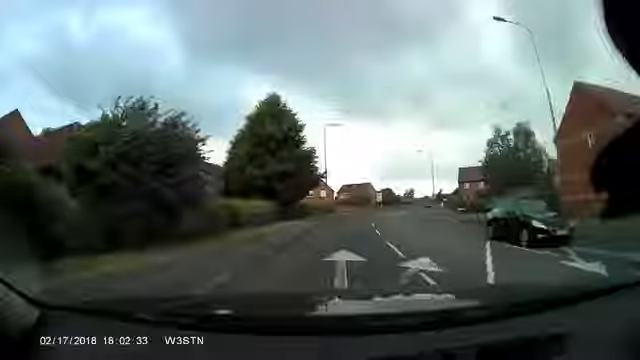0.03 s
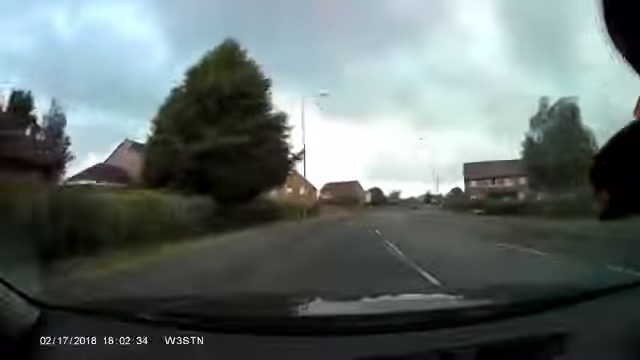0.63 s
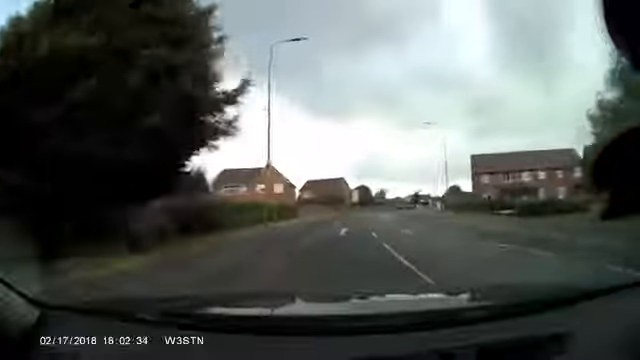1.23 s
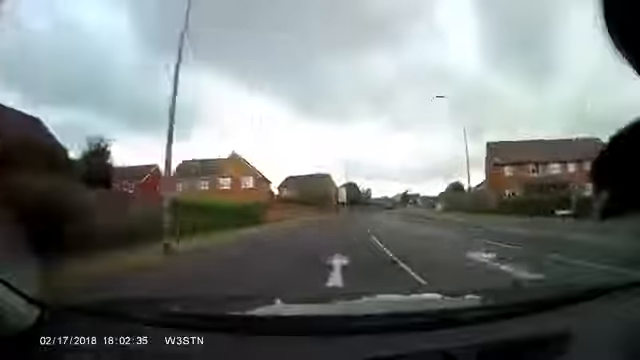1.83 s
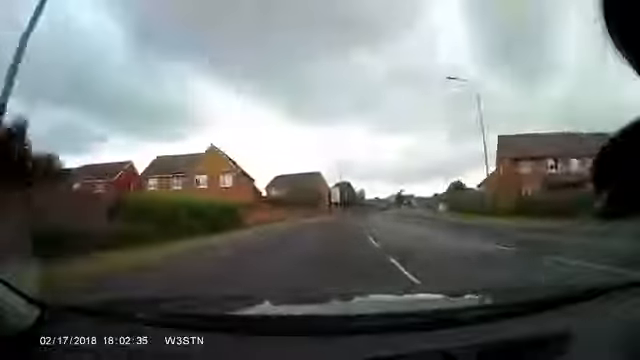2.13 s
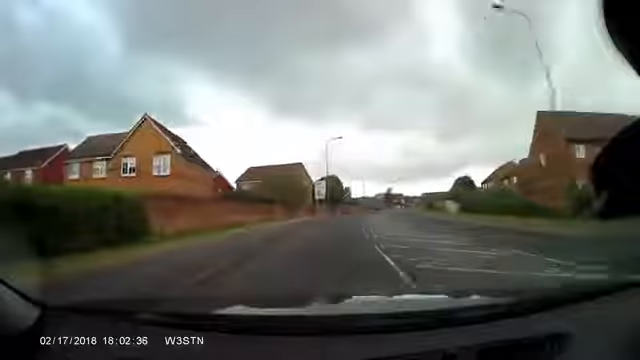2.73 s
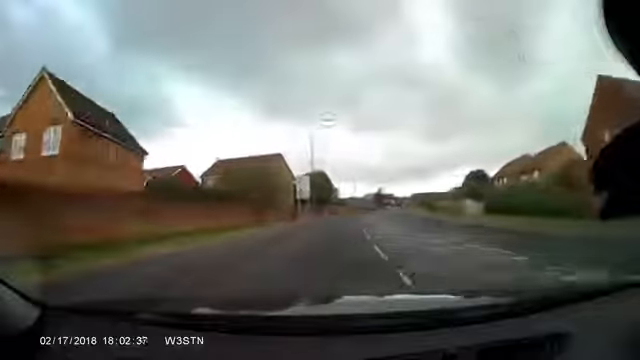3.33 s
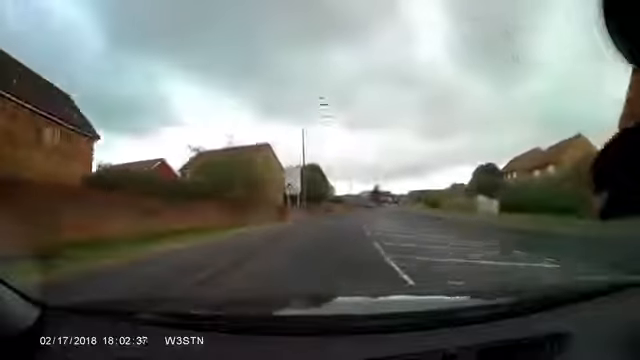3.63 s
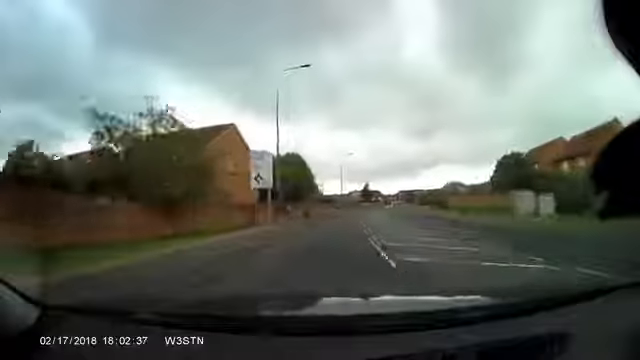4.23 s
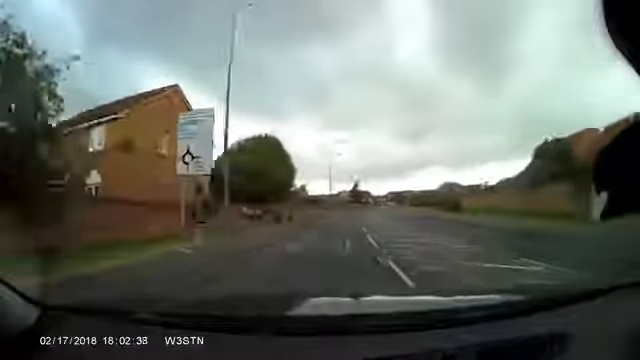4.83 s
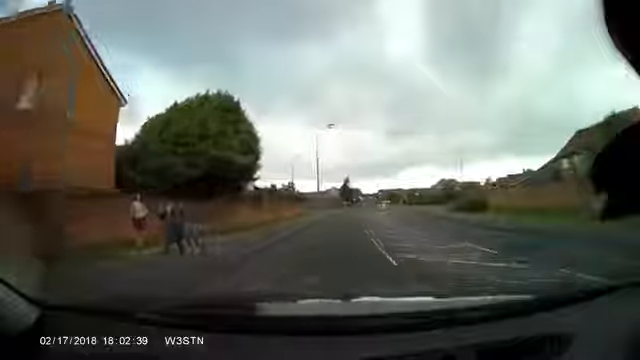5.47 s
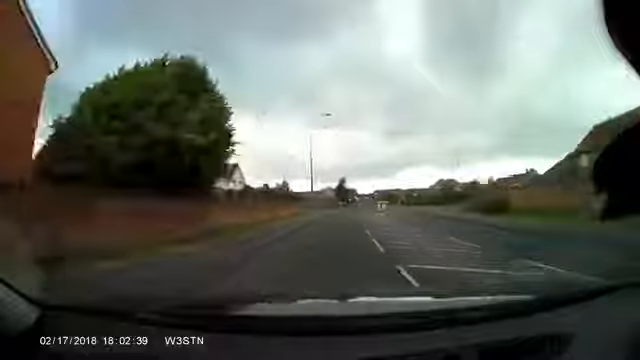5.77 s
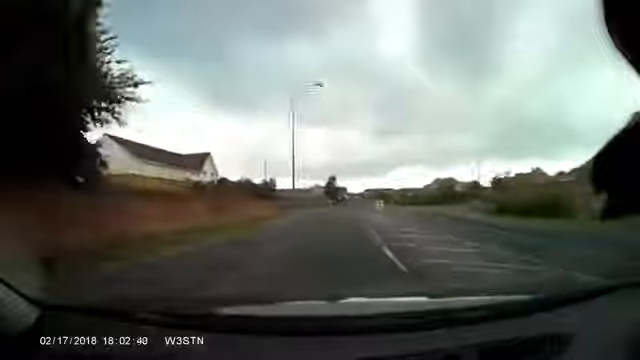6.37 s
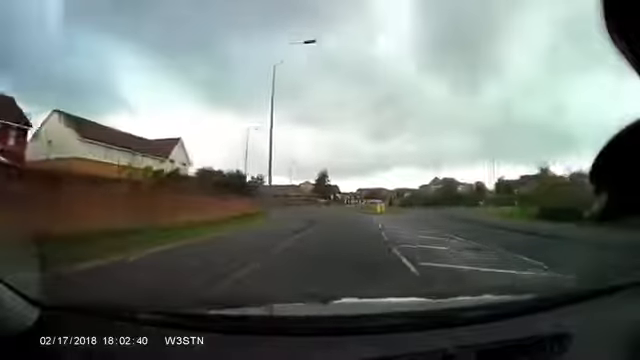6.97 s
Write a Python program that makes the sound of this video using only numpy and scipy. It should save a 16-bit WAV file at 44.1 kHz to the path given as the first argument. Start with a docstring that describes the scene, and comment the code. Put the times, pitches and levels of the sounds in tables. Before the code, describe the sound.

A car rolls over rough asphalt, its cabin filled with a deep hum and tyre noise that gradually soften. A microphone by the windscreen picks up small ticks and rustles from the trim, along with a thin hiss and whine of its own. Late on, something hard hits the bodywork close by, making a single short, slightly distorted bang, and the car keeps rumbling along.

```python
"""A low rumble and the roar of tyres, heard inside a car that gradually eases off on a town road.
The rough road shakes the cabin, which hums at its own favourite pitches, while the trim rustles
and ticks faintly. Near the end a hard object strikes the car once, close by: a panel rings and
overloads the microphone of a camera at the windscreen. The camera adds a faint hiss and whine."""
import sys
import numpy as np
from scipy import signal
from scipy.fft import rfft, irfft
from scipy.io import wavfile
from scipy.ndimage import uniform_filter1d

SR = 44100
rng = np.random.default_rng(int(sys.argv[2]) if len(sys.argv) > 2 else 0)


def master(y):
    """Save y as 16-bit WAV."""
    cut = np.clip(np.atleast_2d(y).T, -1, 1)
    pcm = np.round(cut * 32767)  # scale
    wavfile.write(sys.argv[1], SR, pcm.astype(np.int16))


N = 308700
T = np.arange(N) / SR
HZ = np.fft.rfftfreq(N, 1 / SR)

# The tone of the road's deep boom, low drone and tyre roar. Each row: frequency in Hz, relative dB.
BOOM_TONE = [(8, -17), (45, -20.5), (62, -10.5), (78, -9.5), (97, -3), (135, 3.5), (155, -11), (190, -27),
             (800, -110)]
DRONE_TONE = [(110, -41.5), (150, -8), (175, 1), (220, -0.5), (252, -7.5), (335, -7), (380, -13),
              (490, -14), (580, -21), (800, -32), (4000, -110)]
ROAR_TONE = [(350, -35.5), (600, -2), (780, 0), (1000, -0.5), (1200, -5.5), (1400, -9), (1600, -15),
             (2000, -25.5), (3000, -38), (8000, -65.5), (11000, -89.5)]
# Pitches the cabin and tyre tread favour. Each row: frequency in Hz, width in Hz, boost in dB.
RESONANCES = [(105.7, 7, 5), (128.9, 18, 5.5), (185.5, 23, 3), (213.8, 16.9, 6.5), (440, 25, 2.5),
              (760.5, 22, 6.5), (807.5, 28, 7), (836, 20, 3.5), (921, 46, 6.5), (1190.5, 42, 6.5),
              (1323, 21, 6), (1409, 26, 4)]
# Rougher asphalt. Each row: middle in seconds, length in seconds, boom and drone changes in dB.
ROUGH_STRETCHES = [(1.1, 0.65, 1, 2), (2.93, 0.48, 3.5, 2), (5.06, .25, 5, -1), (5.78, .4, 2.5, 1.1),
                   (6.22, 0.18, -3, 3), (6.8, .4, 2, -.5)]
# The notes of the struck panel. Each row: pitch in Hz, level in dB, seconds to fade by 60 dB,
# delay after the blow in seconds.
PANEL_NOTES = [(112, -15.5, 0.11, 0.0038), (192, -2.5, 0.086, .0065), (223, -9, 0.046, .008),
               (325, -2.5, 0.066, .003), (422, -8, 0.083, .005), (599, -6.5, .065, .003),
               (728, 6.5, 0.037, 0.0017), (799, 0.5, 0.034, 0.0018), (1108, -3, .045, 0.00063),
               (1273, 6.5, 0.04, 0.0009), (1386, -8.5, 0.055, 0.00049), (1480, -6, .05, 0.0016),
               (1570, -11, 0.033, 0.005), (1820, -10, 0.045, 0.0018), (1940, -12, 0.051, 0),
               (2350, -17, 0.053, 0.00098), (2728, -16, .042, 0.00041), (2875, -15.5, 0.054, 0.0003),
               (3350, -9, 0.039, 0.0019), (3530, -11, 0.044, 0), (3740, -16, 0.045, 0.0011),
               (4865, -3.5, .016, 0.00051), (5270, -15, 0.024, 0.0023), (6370, -12, 0.027, 0.0013)]
# The crack: crowded panel notes and cabin echoes. Each row: frequency in Hz, relative dB.
CRACK_TONE = [(100, -20), (300, 4.5), (800, 3.5), (1400, -5), (2200, -17), (3400, -10.5), (5500, -15),
              (7500, -22), (10000, -43), (15000, -60)]
# How long the crack lasts. Each row: frequency in Hz, seconds to fade by 60 dB.
CRACK_FADE = [(200, 0.13), (800, 0.1), (3000, 0.077), (8000, 0.036)]
# Bouts of rustling in the trim. Each row: start in seconds, length in seconds, level in dB.
RUSTLES = [(.2, .25, -62), (1.12, .5, -59), (1.74, .2, -60), (2.02, 0.31, -56), (4.45, .4, -60),
           (5.43, .53, -52.5)]
# Creaks, squeaks and ticks of the trim. Each row: start in seconds, level in dB, pitch in Hz,
# width in octaves, seconds to fade by 60 dB.
TICKS = [(0.273, -44, 7500, .6, .02), (.515, -65, 3800, .02, 1.1), (.732, -43, 9050, .4, .015),
         (2.095, -55, 4000, .8, .07), (4.54, -58, 3800, .03, .2), (5.464, -45, 3200, .8, .06),
         (5.514, -38.5, 4500, 0.95, 0.045), (5.582, -43, 2900, .6, .07), (5.683, -46, 3400, 0.43, 0.072),
         (5.757, -52, 4500, .8, .04), (6.738, -47, 6500, .4, .02), (6.859, -46.5, 2820, .6, .06)]
# The tone of the hiss, which also shapes the trim's sounds. Each row: frequency in Hz, relative dB.
HISS_TONE = [(500, -8), (2200, 3.5), (4500, 0.5), (6800, 0.5), (8200, -2), (9400, -6.5), (9800, -11.5),
             (10400, -62.5)]
# The steady whine of the camera's electronics. Each row: pitch in Hz, average (rms) level in dB.
WHINE_NOTES = [(3935, -72), (5728, -77), (7643, -77), (7866, -75)]


def road(boom_db=-32.0, drone_db=-24.0, roar_db=-35.5):
    """Rough asphalt shakes the body and the tyres; both sound through the same resonances."""
    boost = sum(db * np.exp(-2 * ((HZ - hz) / width) ** 2) for hz, width, db in RESONANCES)
    boom = steadied(noise(look_up(BOOM_TONE, HZ) + boost))
    drone = steadied(noise(look_up(DRONE_TONE, HZ) + boost))
    roar = noise(look_up(ROAR_TONE, HZ) + boost)
    rough_boom_db, rough_drone_db = rough_asphalt()
    doublings = np.log2(car_speed())  # goes negative as the car slows: only the boom grows
    boom *= amp(boom_db - 6.5 * doublings + rough_boom_db)
    drone *= amp(drone_db + 3.5 * doublings + rough_drone_db)
    roar *= amp(roar_db + 10.5 * doublings)
    return boom + drone + roar


def car_speed(share_lost=0.3, slowing_s=7.05):
    """The car eases off, gently at first. Its starting speed counts as 1."""
    return np.clip(1 - share_lost * (T / slowing_s) ** 1.8, 0.05, 1)


def rough_asphalt():
    """Each rough stretch smoothly shifts the boom and the drone by a few dB, then lets them return."""
    boom = drone = 0
    for middle, length, boom_db, drone_db in ROUGH_STRETCHES:
        hump = np.cos(np.pi * np.clip((T - middle) / length, -0.5, 0.5))
        boom += boom_db * hump
        drone += drone_db * hump
    return boom, drone


def panel_bang(start_s=6.053, crack_db=-4.5, crack_rise_s=0.0006):
    """One blow bends a panel. Short ripples run faster, so high notes tend to arrive before the thud."""
    t = T[:SR // 3]
    out = np.zeros(N)
    for hz, db, fade_s, delay_s in PANEL_NOTES:
        swell = 1 - np.exp(-2 * hz * t)  # each note builds up within one cycle
        note = amp(db - 60 * t / fade_s) * swell * np.sin(2 * np.pi * hz * t)
        add(out, start_s + delay_s, note)
    burst = noise(look_up(CRACK_TONE, HZ))[:len(t)]
    band_hz, age, bands = signal.stft(burst, SR, nperseg=256)
    fade = amp(-60 * age / look_up(CRACK_FADE, band_hz)[:, None])  # high bands die first
    crack = signal.istft(bands * fade, SR, nperseg=256)[1][:len(t)]
    add(out, start_s, amp(crack_db) * crack * (1 - np.exp(-t / crack_rise_s)))
    return out


def trim_ticks(rise_s=0.001):
    """The trim creaks, squeaks and ticks: each is a band of noise that starts sharply and fades."""
    t = T[:SR // 3]
    freqs = np.fft.rfftfreq(len(t), 1 / SR)
    out = np.zeros(N)
    for start, db, hz, octaves, fade_s in TICKS:
        band = np.exp(-0.5 * (np.log2((freqs + 1) / hz) / octaves) ** 2)
        band *= amp(look_up(HISS_TONE, freqs))
        scrape = unit(irfft(rfft(rng.standard_normal(len(t))) * band, len(t)))
        add(out, start, scrape * amp(db - 60 * t / fade_s) * (1 - np.exp(-t / rise_s)))
    return out


def trim_rustle(slips_per_s=650, spread_db=3.5, rest_db=-73.5, rise_s=0.06, fade_db=-9, release_s=0.08):
    """Tiny slips in the trim blur into a rustle that comes in bouts and never quite stops."""
    sizes = amp(spread_db * np.minimum(rng.exponential(1, N), 3)) * rng.choice([-1, 1], N)
    slips = sizes * (rng.random(N) < slips_per_s / SR)
    level = amp(rest_db)
    for start, length, db in RUSTLES:
        age = np.clip(T - start, 0, length)
        on_off = np.minimum(age / rise_s, 1) * np.minimum((length - age) / release_s, 1)
        level = level + on_off * amp(db + fade_db * age / length)
    tone_db = look_up(HISS_TONE, HZ) + 3 * np.log2(HZ + 1)  # 3 dB per octave brighter than the hiss
    return level * coloured(slips, tone_db)


def camera_electronics(hiss_db=-57, buzz_db=-62.0, buzz_hz=7866):
    """The camera's electronics make an even hiss, a thin buzz and a steady whine."""
    tone_db = look_up(HISS_TONE, HZ)
    flip = np.sign(np.sin(2 * np.pi * 15 * T))  # changes sign thirty times a second
    buzz = amp(buzz_db) * coloured(flip * np.sin(2 * np.pi * buzz_hz * T), tone_db)
    whine = sum(amp(db) * np.sin(2 * np.pi * (hz * T + rng.random())) for hz, db in WHINE_NOTES)
    return amp(hiss_db) * noise(tone_db) + buzz + np.sqrt(2) * whine


def amp(db):
    """Turns decibels into a number to multiply by."""
    return 10 ** (np.asarray(db) / 20)


def unit(x):
    """Scales a sound to an average (rms) level of 1."""
    return x / np.sqrt(np.mean(x ** 2) + 1e-20)


def look_up(table, hz):
    """Reads between a table's rows, with frequencies spaced by octaves."""
    row_hz, value = np.transpose(table)
    return np.interp(np.log(hz + 1), np.log(row_hz + 1), value)


def coloured(x, db):
    """Turns each frequency up or down by the given dB, then scales the sound to level 1."""
    return unit(irfft(rfft(x) * amp(db), N))


def noise(db):
    """Noise at level 1 with the given tone."""
    return coloured(rng.standard_normal(N), db)


def steadied(x, span_s=0.17):
    """Takes the slow swells out of a noise and keeps its fast flutter."""
    size = int(span_s * SR)
    power = uniform_filter1d(uniform_filter1d(x ** 2, size), size)
    return x / np.sqrt(abs(power) + 1e-12)


def add(mix, start_s, sound):
    """Mixes a sound in at the given time."""
    part = mix[round(start_s * SR):][:len(sound)]
    part += sound[:len(part)]


def scene():
    """Everything reaches one microphone inside the cabin."""
    return (road() + camera_electronics() + trim_rustle() + trim_ticks() + panel_bang())[None]


def record(dry, switch_on_s=0.188, top_hz=14600):
    """The microphone switches on, flattens peaks that are too loud and loses the highest treble."""
    live = dry * (T >= switch_on_s)
    clipped = live / (1 + live ** 8) ** (1 / 8)
    lowpass = signal.firwin(511, top_hz, window=("kaiser", 9), fs=SR)
    return signal.oaconvolve(clipped, lowpass[None], "same")


dry = scene()
out = record(dry)
master(out)
```